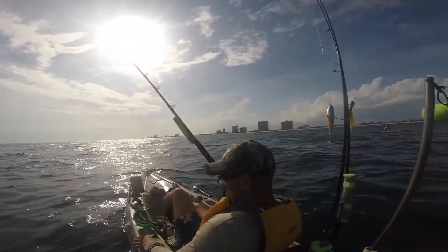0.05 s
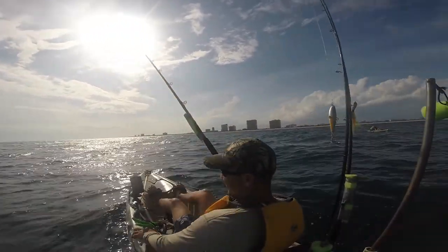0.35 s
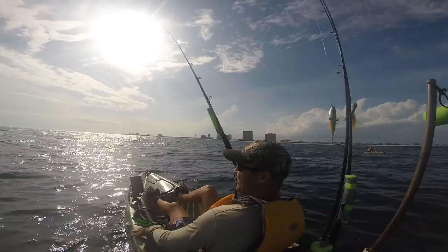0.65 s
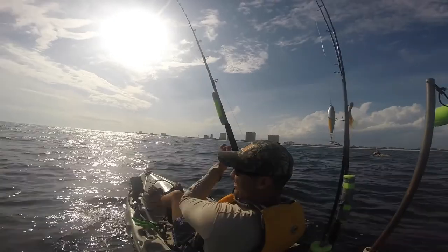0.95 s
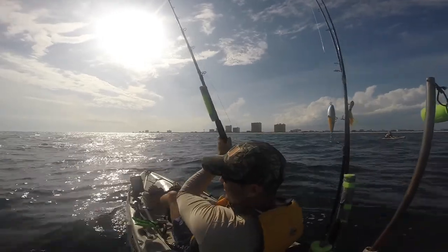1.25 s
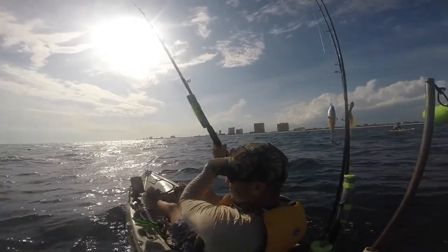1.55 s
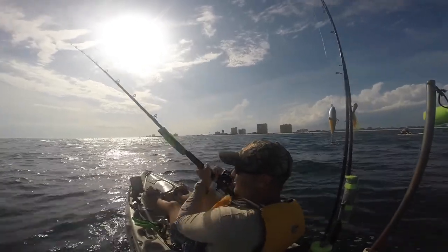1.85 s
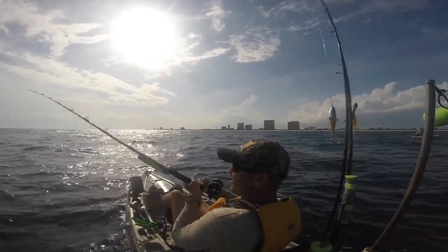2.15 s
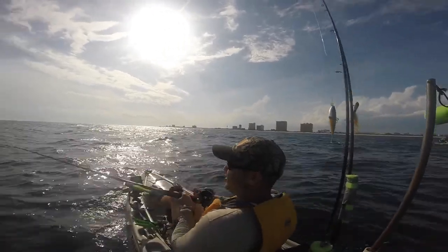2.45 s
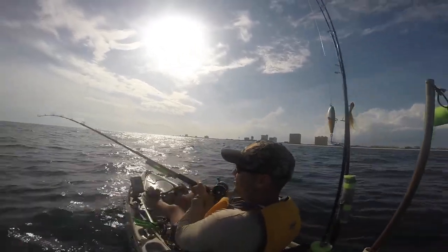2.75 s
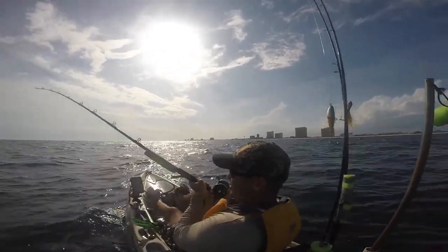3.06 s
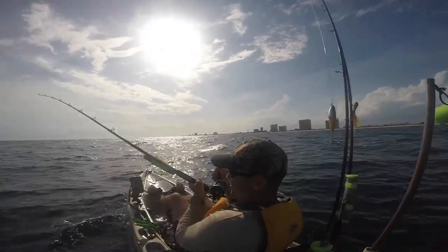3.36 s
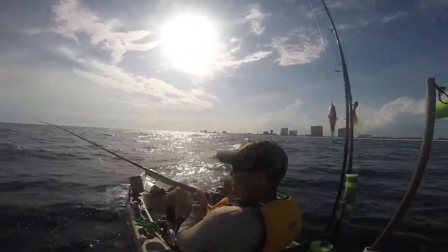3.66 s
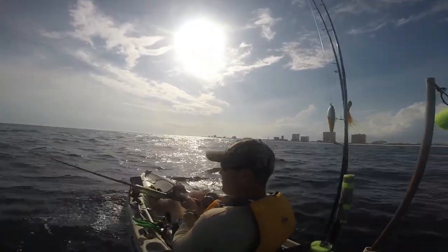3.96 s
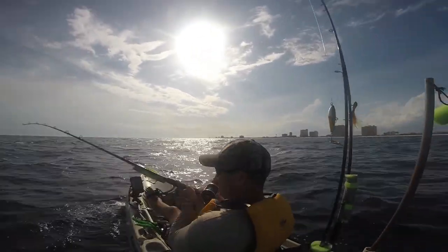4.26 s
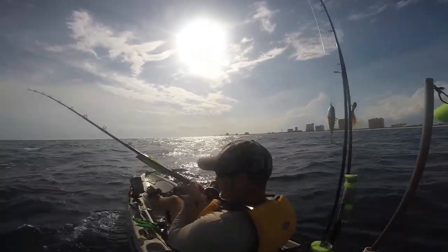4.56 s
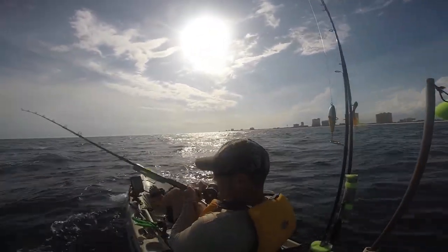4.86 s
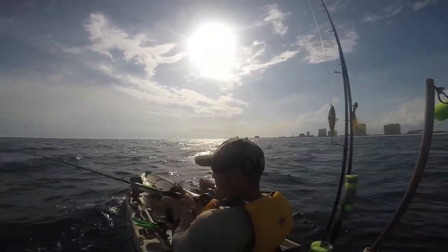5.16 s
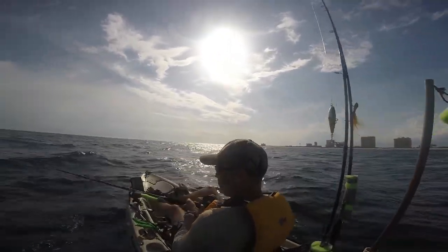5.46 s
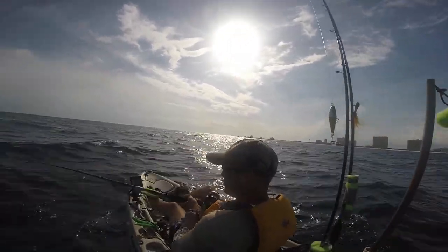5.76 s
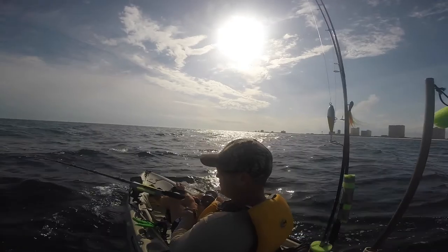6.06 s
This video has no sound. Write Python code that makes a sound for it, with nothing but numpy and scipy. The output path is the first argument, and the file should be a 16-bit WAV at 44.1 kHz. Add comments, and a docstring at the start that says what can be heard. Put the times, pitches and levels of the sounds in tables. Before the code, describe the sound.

Heard from a microphone on a plastic kayak, water slaps and gurgles unevenly against the hollow shell, over an even sea hiss and low wind buffeting. Early splashes and small bubbles are followed by a few dry plastic clacks. One wave then hits with a loud, deep thump, the sound narrows from stereo to mono, and more slaps follow.

```python
"""A plastic kayak in small choppy waves on open water, the microphone mounted on the boat, in the wind.
First, waves splash on the side, gulp under the hull with a falling pitch and set the hollow shell booming.
The plastic ticks faintly in the first second and knocks louder from 1.7 s, among bubbles and fine spray.
The biggest wave thumps flat on the hull at 4.2 s, and just after it the stereo image closes to mono.
One more group of slaps lands near 5.8 s. The wash of the sea and the wind's rumble run throughout."""
import sys
import numpy as np
from scipy import signal
from scipy.fft import rfft, irfft, next_fast_len
from scipy.io import wavfile
from scipy.ndimage import uniform_filter1d

SR = 44100
rng = np.random.default_rng(int(sys.argv[2]) if len(sys.argv) > 2 else 0)


def int16_out(signal):
    """Quantize to a 16-bit WAV file."""
    q = np.round(np.clip(np.atleast_2d(signal).T, -1, 1) * 32767)
    wavfile.write(sys.argv[1], SR, q.astype(np.int16))


N = 273275
TIME = np.arange(N) / SR

# Gulps under the hull. Each row: start in seconds, relative level in dB, length in seconds, pitch in Hz.
HULL_GULPS = [(0, -16.5, 0.028, 203), (.116, -31, 0.028, 386), (0.199, -28, 0.09, 343),
              (0.485, -16.5, 0.064, 422), (0.677, -20, 0.042, 420), (0.749, -27, 0.12, 402),
              (0.856, -23.5, 0.095, 386.6), (1.29, -26, 0.135, 214.3), (1.721, -31.5, 0.079, 376),
              (1.899, -26, 0.08, 426), (2.496, -18.5, 0.049, 432), (2.545, -13, 0.078, 332.7),
              (2.673, -27, 0.091, 396), (3.624, -22.5, 0.035, 444), (3.644, -16.5, 0.038, 389),
              (3.675, -28, .04, 200), (3.809, -28, 0.079, 223.4), (4.121, -21.5, 0.051, 419),
              (4.155, -5, .024, 185), (4.185, -14.5, 0.055, 201), (4.529, -25, 0.047, 410),
              (4.68, -21, 0.054, 366), (4.775, -13.5, 0.062, 379), (4.932, -25.5, 0.062, 306),
              (5.157, -30.5, 0.093, 263), (5.31, -31.5, 0.064, 410), (5.61, -20.5, 0.051, 372),
              (5.793, -15, 0.063, 376), (5.86, -14, 0.043, 379), (5.892, -17, 0.026, 318)]
# The shell heaving in a trough. Each row: start in seconds, level in dB, length in seconds, pitch in Hz.
SHELL_BOOMS = [(.006, -12, 0.047, 89.8), (.112, -17, 0.077, 89.6), (.24, -22.5, 0.065, 85.5),
               (.368, -21, 0.04, 81.6), (.477, -12, 0.071, 96), (.828, -24.5, 0.081, 91.4),
               (.94, -29.5, 0.067, 88), (1.31, -26.5, 0.098, 88.7), (1.41, -26, 0.076, 88.2),
               (1.895, -23, 0.052, 46), (1.972, -19, 0.038, 90.6), (2.131, -20.5, 0.093, 86.6),
               (2.592, -14.5, 0.053, 96.8), (2.7, -23, 0.079, 84.3), (3.16, -29.5, 0.15, 85.6),
               (3.63, -18.5, 0.044, 95.5), (3.672, -14.5, 0.071, 91.8), (3.805, -21, 0.12, 44),
               (4.04, -29, 0.057, 87), (4.155, -8, 0.097, 94.9), (4.295, -18.5, 0.06, 76.3),
               (4.795, -16, 0.11, 90.1), (4.965, -27, 0.095, 86.7), (5.175, -22.5, 0.093, 86),
               (5.333, -21.5, 0.065, 43.2), (5.63, -20, 0.042, 83.3), (5.81, -14, 0.081, 92),
               (5.85, -15.5, 0.24, 40.94), (5.925, -9.5, 0.11, 85.9)]
# Resonances of the hollow hull and its stiff wall. Each row: centre in Hz, width in Hz, gain in dB.
HULL_MODES = [(94.6, 25, -3.5), (133.4, 57, -1), (190.4, 8, 8), (299.2, 38, -1), (377, 29, -1.5),
              (465.5, 8.7, -4)]
WALL_MODES = [(820, 580, -10), (894, 256, 4.5), (1386, 91, 3.5), (1626, 93, 2), (2140, 116, -4),
              (2560, 190, -1.5)]
# The fizz of foam and spray. Each row: time in seconds, relative level in dB.
FIZZ_CURVE = [(0.0, -58.5), (0.72, -63.5), (2.23, -60), (2.275, -55), (2.33, -63), (3.18, -59.5),
              (3.61, -59), (3.635, -50), (3.66, -58.5), (3.87, -50.5), (3.95, -53), (4.06, -65),
              (4.14, -53), (4.19, -63), (4.47, -54.5), (4.49, -59.5), (5.73, -62.5), (5.78, -56),
              (5.9, -59), (6.03, -52.5), (6.14, -55), (6.2, -58)]


def gain_of(db):
    """Decibels to amplitude."""
    return 10 ** (np.asarray(db) / 20)


def unit_rms(x):
    """Scales to rms 1."""
    return x / np.sqrt(np.mean(x ** 2) + 1e-20)


def steadied(x, span_s):
    """Holds the rms near 1 over a sliding span."""
    return x / np.sqrt(abs(uniform_filter1d(x ** 2, max(int(span_s * SR), 2))) + 1e-20)


def follow(curve):
    """Amplitude over time from rows of seconds and dB."""
    return gain_of(np.interp(TIME, *np.transpose(curve)))


def coloured(x, spectrum):
    """Filters by rows of Hz and dB."""
    hz, db = np.transpose(spectrum)
    size = next_fast_len(len(x))
    bin_db = np.interp(np.log(np.fft.rfftfreq(size, 1 / SR) + 1), np.log(hz), db)
    return irfft(rfft(x, size) * gain_of(bin_db), size)[:len(x)]


def lowpass(x, hz, order):
    """Causal low-pass."""
    return signal.sosfilt(signal.butter(order, hz, fs=SR, output="sos"), x)


def wobble(samples, hz):
    """Random wavering at rms 1, mostly slower than hz."""
    return unit_rms(lowpass(rng.standard_normal(samples), hz, order=2))


def sine(hz):
    """A tone that follows a pitch curve."""
    return np.sin(2 * np.pi * np.cumsum(hz) / SR)


def resonate(x, hz, width_hz):
    """Two passes through a resonance whose centre may move."""
    turn = np.exp(2j * np.pi * np.cumsum(hz * np.ones(len(x))) / SR)
    pole = np.exp(-np.pi * width_hz / SR)
    for _ in range(2):
        x = 2 * (turn * signal.lfilter([1 - pole], [1, -pole], x / turn)).real
    return x


def ring(x, modes, neighbour=-1):
    """Drives modes; neighbours swing against each other (-1) or together (1, deep valleys between)."""
    return sum(neighbour ** k * gain_of(db) * signal.lfilter(*signal.iirpeak(hz, hz / width, SR), x)
               for k, (hz, width, db) in enumerate(modes))


def impacts(samples, per_s, spread_db):
    """Random impulses of uneven size, at rms 1."""
    size = gain_of(spread_db * np.minimum(rng.exponential(1, samples), 4))
    return unit_rms(size * rng.choice([-1, 1], samples) * (rng.random(samples) < per_s / SR))


def swell(rise, decay, power=1):
    """Time axis and envelope of a push of water: smooth rise, then a fall, more abrupt at higher power."""
    t = np.arange(int((rise + 7 * decay) * SR)) / SR
    attack = np.sin(np.pi / 2 * np.minimum(t / rise, 1)) ** 2
    return t, attack * np.exp(-(np.maximum(t - rise, 0) / decay) ** power)


def split(length, rise_share):
    """Divides a length into rise and decay."""
    rise = length * rise_share
    return rise, length - rise


def play(table, source):
    """Places one sound per row: start in seconds, gain in dB, then the source's arguments."""
    mix = np.zeros(N)
    for start, db, *shape in table:
        sound = gain_of(db) * source(*shape)
        part = mix[round(start * SR):][:len(sound)]
        part += sound[:len(part)]
    return mix


def gulp(length, first_hz, sag_octaves_per_s=10.28):
    """Churning water drives a trapped air pocket, whose pitch falls as it grows; the hull colours it."""
    rise, decay = split(length, rise_share=0.26)
    t, envelope = swell(rise, decay, power=1.16)
    last_hz = first_hz * 2 ** (-sag_octaves_per_s * length)
    glide_s = 0.94 * (rise + decay / 2)
    hz = last_hz + (first_hz - last_hz) * np.exp(-(t / glide_s) ** 2)
    churn = resonate(rng.standard_normal(len(t)), hz, width_hz=0.88 * first_hz)
    pocket = steadied(churn, span_s=0.014) + 0.55 * sine(hz)
    hull = steadied(ring(pocket, HULL_MODES, neighbour=0.62), span_s=0.014)
    return envelope * lowpass(hull, hz=517, order=6)


def thumps():
    """Waves land flat on the hull and kick all its resonances at once; a shorter push is brighter."""
    # Each row: start in seconds, peak in dB, length of the push in seconds.
    landings = [(.492, -17, .007), (3.63, -17, 0.0046), (3.654, -14, 0.0042), (4.127, -17, .007),
                (4.168, 0, 0.0063), (4.787, -19, 0.007), (5.172, -21, 0.0063), (5.62, -13, 0.008),
                (5.805, -13.5, 0.0043)]

    def thump(push):
        t = np.arange(SR // 5) / SR
        force = np.sin(np.pi * np.minimum(t / push, 1)) ** 2
        sound = lowpass(ring(force, HULL_MODES, neighbour=0.98), hz=520, order=4)
        return sound / abs(sound).max()
    return play(landings, thump)


def booms(hard_db=-14.5, sag=0.059, roughness=0.24):
    """The shell swings, its pitch sagging as water loads it; the hardest gulps ring its upper notes."""
    # Each row: lag in seconds, dB added to the gulp's row, length in seconds, pitch in Hz.
    upper_notes = [(.004, -3.5, 0.061, 189.8), (.004, -6.5, 0.05, 138)]
    upper_booms = [(start + lag, db + note_db, length, hz)
                   for start, db, *_ in HULL_GULPS if db > hard_db
                   for lag, note_db, length, hz in upper_notes]

    def boom(length, hz):
        rise, decay = split(length, rise_share=0.38)
        t, envelope = swell(rise, decay, power=1.04)
        pitch_hz = hz * (1 - sag * np.tanh((t - rise) / decay))
        phase = 2 * np.pi * np.cumsum(pitch_hz) / SR
        return envelope * unit_rms(np.sin(phase + roughness * wobble(len(t), hz=44.3)))
    return play(SHELL_BOOMS + upper_booms, boom)


def knocks(rise=0.0028, ring_db=-22):
    """Dry clacks on the plastic: the contact chatters for milliseconds, then the wall rings faintly."""
    # Each row: start in seconds, level in dB, decay in seconds, upper edge in Hz.
    hits = [(.435, -29, 0.0035, 3400), (.683, -29.5, 0.0037, 2970), (.709, -31.5, 0.0058, 3600),
            (1.728, -18.5, 0.0054, 2520), (1.772, -22, 0.0066, 2980), (1.801, -28, .005, 2950),
            (1.843, -39, .005, 2400), (2.049, -21, 0.0052, 2370), (2.081, -30, 0.0075, 2190),
            (2.678, -22, 0.0046, 2900), (2.694, -24.5, 0.0029, 2300), (2.706, -24.5, .0025, 2180),
            (2.718, -29, 0.0022, 2090), (2.76, -24.5, 0.0052, 2300), (2.801, -28, 0.0036, 1710),
            (3.561, -27, 0.0036, 1610)]
    # Colour of the clack. Each row: frequency in Hz, gain in dB.
    spectrum = [(150, -11), (300, -1), (500, -5.5), (680, -14.5), (980, 6.5), (1250, 2), (2000, -5),
                (2230, -8), (2650, -0.5), (3300, -17.5), (5000, -20)]

    def knock(decay, edge_hz):
        t, tail = swell(rise, decay=0.0077)
        chatter = rng.standard_normal(len(t))
        contact = np.minimum(t / rise, 1) * np.exp(-np.maximum(t - rise, 0) / decay)
        clack = steadied(lowpass(coloured(chatter, spectrum), edge_hz, order=8), span_s=0.0034)
        wall = gain_of(ring_db) * tail * unit_rms(ring(chatter, WALL_MODES))
        return lowpass(contact * clack + wall, hz=3600, order=6)
    return play(hits, knock)


def splashes(mist_db=-27):
    """Water breaks against the side: a shower of drops on the wall, with a little fine mist."""
    # Each row: start in seconds, relative level in dB, decay in seconds, upper edge in Hz.
    breaks = [(.15, -47, 0.13, 2720), (.41, -45, 0.072, 2000), (.432, -40, 0.021, 3300),
              (.479, -33.5, 0.058, 3030), (.545, -38, 0.05, 2900), (.587, -32.5, 0.032, 2680),
              (.742, -43, 0.03, 2620), (.859, -38.5, 0.016, 1290), (.885, -39, 0.0089, 2200),
              (.941, -36.5, 0.011, 2530), (1.893, -45, 0.044, 2200), (2.1, -35, 0.014, 1630),
              (2.261, -44, 0.02, 1900), (2.503, -36.5, 0.023, 1140), (2.722, -46, 0.02, 1700),
              (3.624, -30, 0.017, 2300), (3.658, -35, 0.016, 2280), (3.881, -37, 0.017, 1740),
              (4.106, -35.5, 0.03, 2220), (4.134, -35.5, 0.03, 2150), (4.441, -37, 0.0096, 2900),
              (4.527, -34, 0.015, 1720), (4.779, -30.5, 0.028, 1490), (5.167, -40, 0.023, 1700),
              (5.28, -43, 0.045, 2440), (5.767, -35.5, .008, 2600), (5.795, -28, 0.021, 2280),
              (5.856, -35, 0.032, 2200)]
    # Colour of the mist. Each row: frequency in Hz, gain in dB.
    spectrum = [(1000, -21), (2200, 14), (3200, 3), (6000, 7), (15000, -25)]

    def splash(decay, edge_hz):
        t, envelope = swell(0.2 * decay, decay)  # longer splashes build more slowly
        wall = ring(impacts(len(t), per_s=3500, spread_db=-1.5), WALL_MODES)
        patter = steadied(lowpass(wall, edge_hz, order=4), span_s=0.0042)
        mist = unit_rms(coloured(rng.standard_normal(len(t)), spectrum))
        return envelope * (patter + gain_of(mist_db) * mist)
    return play(breaks, splash)


def bubble(length, first_hz, last_hz, flutter=0.0074):
    """A near-pure ring that glides and flutters as the bubble changes shape."""
    t, envelope = swell(*split(length, rise_share=0.42), power=1.1)
    hz = last_hz + (first_hz - last_hz) * np.exp(-t / length)
    hz *= 1 + flutter * wobble(len(t), hz=220)
    return envelope * unit_rms(sine(hz))


def bubbles():
    """Single bubbles ring, from fat glugs under the hull to small plips."""
    # Each row: start in seconds, level in dB, length in seconds, first and last pitch in Hz.
    plips = [(.16, -40, 0.011, 1470, 1730), (.543, -36, 0.015, 1750, 1750),
             (.552, -38.5, 0.054, 3030, 3060), (.599, -39, 0.02, 3100, 3120), (.596, -30, 0.02, 1620, 1490),
             (.636, -27, 0.011, 1500, 1400), (.882, -34.5, .02, 813, 870), (2.505, -30.5, 0.017, 864, 870),
             (2.553, -20.5, 0.026, 368, 290), (3.028, -42, 0.011, 1630, 1760),
             (3.182, -30.5, 0.0026, 3570, 4220), (4.413, -30.5, 0.012, 1430, 1370),
             (4.422, -38, 0.0073, 1840, 2010), (4.528, -30.5, 0.012, 1327, 1440),
             (4.688, -25.5, 0.038, 351, 423), (5.622, -24.5, 0.027, 373, 365),
             (5.777, -26.5, 0.0089, 1350, 1360), (5.796, -31, 0.0072, 2075, 2160),
             (5.91, -37.5, 0.012, 1266, 1310)]
    return play(plips, bubble)


def droplets(decay=0.0009, tick_db=-7):
    """Single drops land, each a tiny tick and a short ping at its own pitch."""
    # Each row: start in seconds, peak in dB, pitch in Hz.
    landings = [(.436, -41, 5300), (.708, -43, 9200), (1.923, -43, 7000), (2.272, -42, 4400),
                (2.545, -41, 3900), (3.633, -36, 5800), (3.906, -38, 7300), (4.125, -41, 5600),
                (4.148, -38, 5900), (4.451, -43, 6500), (5.53, -42, 5500), (5.951, -37, 7300),
                (6.088, -37, 3400)]
    # Colour of the tick. Each row: frequency in Hz, gain in dB.
    spectrum = [(1500, -29.5), (4000, 23), (7700, 8), (8600, 2), (15000, -7)]

    def droplet(hz):
        t = np.arange(SR // 50) / SR
        tick = rng.standard_normal(len(t)) * np.exp(-t / decay)
        ping = resonate(tick, hz, width_hz=1000)
        sound = unit_rms(ping) + gain_of(tick_db) * unit_rms(coloured(tick, spectrum))
        return sound / abs(sound).max()
    return play(landings, droplet)


def lapping(murmur_db=2.5, trickle_db=-8.5, cycles=8):
    """Ripples keep the hull murmuring and shed tiny bubbles of all sizes."""
    # Each row: time in seconds, relative level in dB.
    ripples = [(0.0, -45), (0.24, -40), (0.71, -36), (1.0, -43), (1.78, -45.5), (1.91, -38), (2.23, -45),
               (2.5, -42.5), (2.64, -37.5), (2.95, -43.5), (3.83, -40.5), (4.5, -43.5), (4.64, -41.5),
               (5.63, -45), (5.88, -40), (6.2, -42.5)]
    hull = ring(rng.standard_normal(N), HULL_MODES, neighbour=0.87)
    murmur = steadied(lowpass(hull, hz=350, order=1), span_s=0.16)
    trickle = np.zeros(N)
    for hz in np.geomspace(800, 2800, 24):
        plip = bubble(cycles / hz, hz, 0.95 * hz)
        trickle += signal.oaconvolve(impacts(N, per_s=45, spread_db=4.5), plip)[:N]
    return follow(ripples) * (gain_of(murmur_db) * murmur + gain_of(trickle_db) * unit_rms(trickle))


def foam(trim_db=-1.5):
    """Tiny bubbles burst after a crest breaks."""
    # Each row: frequency in Hz, gain in dB.
    spectrum = [(1500, 0.5), (3000, 9.5), (4100, 11), (5800, 2.5), (7700, 5), (8200, -5), (10000, -13),
                (15000, -31.5)]
    bursts = coloured(impacts(N, per_s=3000, spread_db=1.5), spectrum)
    return gain_of(trim_db) * follow(FIZZ_CURVE) * unit_rms(bursts)


def spray(trim_db=-4.5, cycles=7):
    """Fine droplets sparkle as they fall back through the foam."""
    sparkle = np.zeros(N)
    for hz in np.geomspace(3100, 7400, 10):
        landings = impacts(N, per_s=24, spread_db=3.0)
        sparkle += signal.oaconvolve(landings, bubble(cycles / hz, hz, hz))[:N]
    return gain_of(trim_db) * follow(FIZZ_CURVE) * unit_rms(lowpass(sparkle, hz=7940, order=10))


def swish():
    """A thin, brief hiss between the waves."""
    # Each row: start in seconds, level in dB, rise and decay in seconds, centre in Hz.
    hisses = [(3.11, -50, 0.065, 0.15, 3970)]

    def hiss(rise, decay, hz):
        t, envelope = swell(rise, decay)
        return envelope * unit_rms(resonate(rng.standard_normal(len(t)), hz, width_hz=900))
    return play(hisses, hiss)


def with_reflections(x, side_db=-20, decay=0.015):
    """Short reflections off deck and water differ between left and right, above the bass."""
    # Each row: frequency in Hz, gain in dB.
    spectrum = [(60, -44), (150, -60), (400, -29), (1000, -29), (2500, 1), (6000, -23)]
    t = np.arange(SR // 50) / SR
    echoes = rng.standard_normal(len(t)) * np.exp(-t / decay)
    side = coloured(signal.oaconvolve(x, echoes / np.linalg.norm(echoes))[:N], spectrum)
    return x + gain_of(side_db) * np.array([side, -side])


def wind(jolt_db=-14):
    """Low buffeting right at the microphone; the shell's low booms shake more rumble into it."""
    # Each row: time in seconds, level in dB.
    gusts = [(0.0, -27.5), (0.91, -30), (1.12, -37), (1.55, -38.5), (1.79, -35.5), (2.14, -32),
             (2.3, -33.5), (2.54, -31.5), (2.62, -31), (3.59, -38), (3.68, -20.5), (3.81, -26.5),
             (4.0, -29.5), (4.4, -33), (4.6, -29), (5.07, -31), (5.4, -42), (5.59, -33), (5.95, -25.5),
             (6.2, -32)]
    # Each row: frequency in Hz, gain in dB.
    spectrum = [(10, -43), (25, -4.5), (40, 8.5), (50, 3.5), (70, -13.5), (88, 7.5), (115, -10),
                (170, -14.5), (300, -68), (700, -66.5)]
    _, jolt = swell(rise=0.027, decay=0.044)
    strength = follow(gusts) + gain_of(jolt_db) * play(SHELL_BOOMS, lambda length, hz: jolt)
    return strength * steadied(coloured(rng.standard_normal(N), spectrum), span_s=0.087)


def sea(level_db=-47, sway_db=1.04):
    """The even hiss of open water all around, slightly wide and gently swaying in level."""
    # Each row: frequency in Hz, gain in dB.
    spectrum = [(100, -5), (200, 2.5), (350, -3), (500, -3.5), (700, -7.5), (1000, -10.5), (1600, -8),
                (2500, -13), (3500, -15.5), (5000, -19.5), (9000, -27), (10000, -25.5), (11500, -30),
                (14000, -31.5), (15500, -36.5)]
    # Stereo width. Each row: frequency in Hz, side minus mid in dB.
    width = [(100, -35.5), (220, -11.5), (450, -4.5), (1000, -11.5), (2200, -8.5), (4000, -15),
             (8000, -24.5), (13000, -14.5)]
    mid, side = (unit_rms(coloured(rng.standard_normal(N), spectrum)) for _ in range(2))
    side = coloured(side, width)
    return gain_of(level_db + sway_db * wobble(N, hz=7.4)) * np.array([mid + side, mid - side])


def scene():
    """Hull and water close by, the wind right at the microphone, the sea all around."""
    hull = gain_of(-4.5) * play(HULL_GULPS, gulp) + thumps() + booms() + knocks()
    water = gain_of(0.5) * splashes() + bubbles() + droplets() + lapping() + foam() + spray()
    return with_reflections(hull + water + swish()) + wind() + sea()


def record(dry, mono_from_s=4.43, closing_s=0.03, edge_hz=15500):
    """The image closes to mono, the biggest slap is rounded off at full scale, the top treble is cut."""
    mid = dry.mean(0)
    width = np.clip((mono_from_s - TIME) / closing_s, 0, 1)
    narrowed = mid + (dry - mid) * width
    limited = narrowed / (1 + narrowed ** 8) ** (1 / 8)
    band_limit = signal.firwin(511, edge_hz, window=("kaiser", 9), fs=SR)
    return signal.oaconvolve(limited, band_limit[None], "same")


dry = scene()
out = record(dry)
int16_out(out)
```